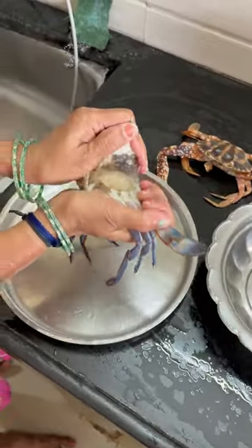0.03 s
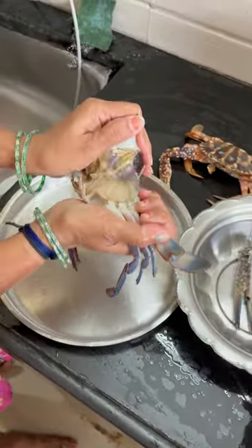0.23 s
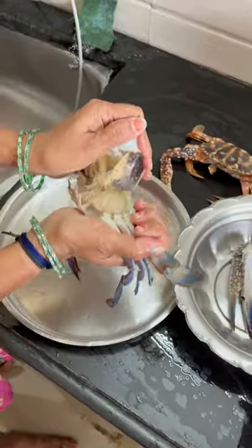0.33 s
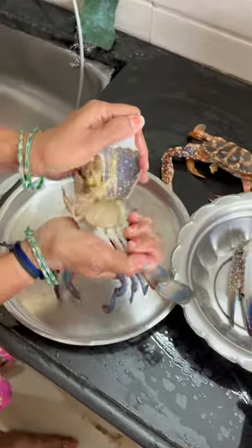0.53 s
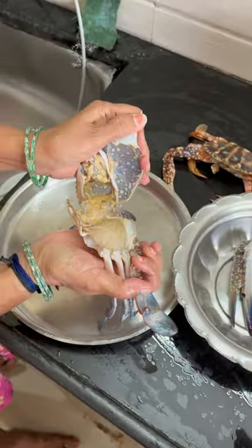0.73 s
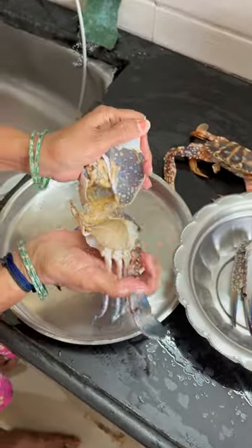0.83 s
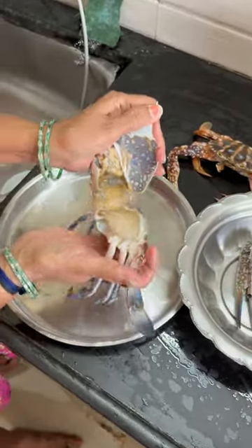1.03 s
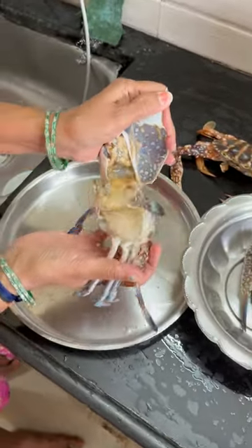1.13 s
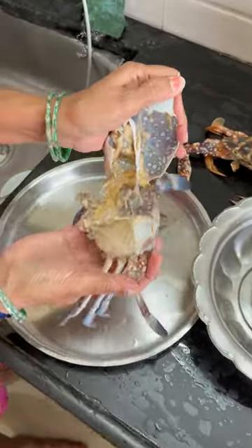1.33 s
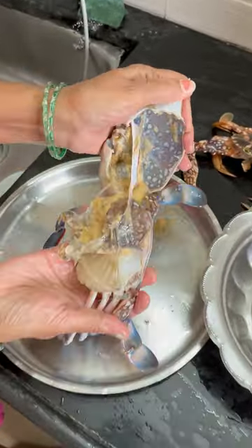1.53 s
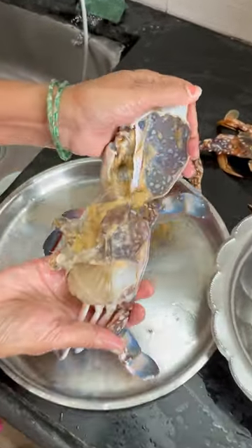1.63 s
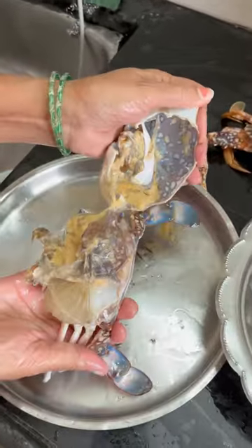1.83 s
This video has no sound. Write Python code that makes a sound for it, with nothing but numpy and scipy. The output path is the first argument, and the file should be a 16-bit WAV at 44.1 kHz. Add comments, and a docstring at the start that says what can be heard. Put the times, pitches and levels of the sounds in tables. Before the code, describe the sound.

A crab shell is cracked open by hand over a steel plate: one loud clattering knock, a run of sharp snaps, then quiet wet crunching and rustling, close up in a reflective tiled kitchen.

```python
"""A steel plate is knocked and rings while hands pry a crab shell open in a tiled kitchen, close to a phone.
Knocks and cracks are coloured noise bursts with struck modes; wet crunches are clusters of damped pops.
Grain noise makes the rustle of flesh and fingers; damped sines make dull bumps and a clink of glass bangles.
Diffuse echoes follow the nearby sounds; room tone and the steady lines of a motor lie underneath."""
import sys
import numpy as np
from scipy import signal
from scipy.fft import rfft, irfft
from scipy.io import wavfile
from scipy.ndimage import uniform_filter1d

SR = 44100
rng = np.random.default_rng(int(sys.argv[2]) if len(sys.argv) > 2 else 0)


def dump_mix(stems):
    """Bounce the given channels to the path in sys.argv[1] as a 16-bit WAV at rate SR."""
    frames = np.atleast_2d(stems).T  # one column per channel
    limited = np.clip(frames, -1, 1)  # hard clip at full scale
    pcm = np.round(limited * 32767).astype(np.int16)
    wavfile.write(sys.argv[1], SR, pcm)


N = 83790
T = np.arange(N) / SR
HZ = np.fft.rfftfreq(N, 1 / SR) + 1e-3  # offset keeps log and division finite

SHARED_TREBLE_HZ = 4900  # above this both channels carry the same treble
CRACK_RISE_S = 0.0014
# Phase lead of the right port for direct sound. Each row: frequency in Hz, lead in radians.
PORT_LEAD = [(200, 0.14), (700, 1.68), (2600, 0.85), (3400, 2.72), (4600, 1.385)]


def undb(db):
    """dB to amplitude gain."""
    return 10 ** (np.asarray(db) / 20)


def unit(x):
    """Scale to rms 1."""
    return x / np.sqrt(np.mean(x ** 2))


def read(table, hz=HZ):
    """Interpolate a (Hz, value) table on a log-frequency axis."""
    table_hz, values = np.array(table).T
    return np.interp(np.log(hz), np.log(table_hz), values)


def colour(x, table):
    """Filter by a (Hz, relative dB) spectrum that falls away outside its ends; white rms 1 stays rms 1."""
    low_edge = np.clip(HZ / table[0][0], 0, 1) ** 2
    high_edge = np.clip(table[-1][0] / HZ, 0, 1) ** 4
    return irfft(rfft(x) * unit(undb(read(table)) * low_edge * high_edge), N)


def burst(s, rise_s, fall_s, hz=0, lead=np.pi / 2):
    """Exponential rise from time s and decay (time constants): a sine, or at the defaults an envelope."""
    out = np.zeros(N)
    rise_s, fall_s = max(rise_s, 1e-4), max(fall_s, 2e-4)
    first = int(np.ceil(s * SR))
    t = T[first:first + int(10 * fall_s * SR)] - s
    envelope = (1 - np.exp(-t / rise_s)) * np.exp(-t / fall_s)
    out[first:first + len(t)] = envelope * np.sin(2 * np.pi * hz * t + lead)
    return out


def tone(s, hz, t60, rise_s, lead=0):
    """A mode struck at time s, its decay falling 60 dB in t60 seconds."""
    return burst(s, rise_s, t60 / np.log(1000), hz, lead)


def splinters(table, mid_table):
    """Rough contact: noise bursts (s, mid dB, treble dB, decay constant s) in two colours, high-passed."""
    # Treble spectrum. Each row: frequency in Hz, relative density in dB.
    treble_table = [(5000, -0.5), (6500, -6), (8000, -6.5), (10500, -12.5), (13000, -14), (15500, -23.5)]
    low_cut_hz = 131
    mid = colour(rng.standard_normal(N), mid_table)
    high = colour(rng.standard_normal(N), treble_table)
    out = np.zeros(N)
    for s, db, treble_db, fall_s in table:
        envelope = burst(s, min(CRACK_RISE_S, fall_s), fall_s)
        out += envelope * (undb(db) * mid + undb(treble_db) * high)
    return signal.sosfilt(signal.butter(2, low_cut_hz, "high", fs=SR, output="sos"), out)


def plate():
    """Each knock is a short rough contact that excites the plate modes, phased differently at each port."""
    # Each row: start in seconds, mid level in dB, treble level in dB, ring level in dB,
    # contact decay constant in seconds.
    knocks = [(0.212, -53.5, -20.5, -60, 0.0019), (0.2199, -25, -71.5, -58, 0.012),
              (0.2243, -8, -6.5, -47, 0.0019), (0.2272, -4.5, -15.5, -26, 0.0038),
              (0.261, -17.5, -25.5, -41, 0.0092)]
    # Each row: mode frequency in Hz, level in dB, 60 dB decay in seconds.
    plate_modes = [(301, -5, .25), (423, -3, .3), (610, -7, .3), (866, -5, .4), (1197, 0, .3),
                   (1435, -13, .8), (1643, 2, .25), (1702, -2, .42), (1981, -12, .9), (2403, -1, .55),
                   (2688, -2, .38), (3062, -5, .38), (3461, -10, .55), (3818, -5, .32), (3950, -3, .25),
                   (4155, -2, .26), (4604, -4, .35)]
    # Contact spectrum. Each row: frequency in Hz, relative density in dB.
    knock_colour = [(200, -5), (400, 2), (700, -12), (1200, -0.5), (2000, -8), (3500, 4), (4700, -3.5)]
    contacts = [(s, db, treble_db, contact_s) for s, db, treble_db, _, contact_s in knocks]
    rough = splinters(contacts, knock_colour)
    ringing = np.zeros((2, N))
    for s, _, _, ring_db, contact_s in knocks:
        rise_s = contact_s / 2
        for hz, mode_db, t60 in plate_modes:
            gain = undb(ring_db + mode_db)
            ringing[0] += gain * tone(s, hz, t60, rise_s)
            ringing[1] += gain * tone(s, hz, t60, rise_s, read(PORT_LEAD, hz))
    return rough, ringing


def shell():
    """A crack is a few ms of splintering plus a brief ring of the shell modes at its own pitch."""
    # Each row: start in seconds, ring level in dB, pitch in Hz, splinter mid level in dB,
    # splinter treble level in dB, ring decay constant in seconds (splinters decay in half of it).
    # Splinter levels are before splinter_gain_db.
    cracks = [(0.5039, -22.5, 1510, -38, -34.5, 0.0022), (.5812, -7, 2080, -19, -18.5, 0.0016),
              (0.62, -18, 1970, -22, -55, 0.0012), (0.635, -12, 1990, -37, -58, 0.00079),
              (0.7104, -20.5, 1080, -36, -50, 0.00074), (.747, -32.5, 2310, -39, -61, 0.0023),
              (1.4795, -51, 4370, -45.5, -61, 0.00099)]
    # Splinter spectrum. Each row: frequency in Hz, relative density in dB.
    crack_colour = [(150, -7), (350, 5), (700, -4), (1300, -2), (2000, -5.5), (3200, 8.5), (4700, 3)]
    # Each row: mode frequency as a multiple of the pitch, level in dB.
    shell_modes = [(1, 0), (.62, -15.5), (1.53, -7), (2.15, -20), (3.7, -13)]
    splinter_gain_db = 18.5
    snaps = [(s, db, treble_db, ring_s / 2) for s, _, _, db, treble_db, ring_s in cracks]
    rough = undb(splinter_gain_db) * splinters(snaps, crack_colour)
    ring = np.zeros(N)
    for s, db, pitch_hz, _, _, ring_s in cracks:
        for ratio, mode_db in shell_modes:
            t60 = ring_s * np.log(1000) / max(ratio, 1)  # higher modes die sooner
            phase = rng.uniform(0, 2 * np.pi)
            ring += undb(db + mode_db) * tone(s, pitch_hz * ratio, t60, CRACK_RISE_S, phase)
    return rough, ring


def crunches():
    """Each wet crunch is a cluster of six tiny damped pops near its pitch, the first the strongest."""
    # Each row: start in seconds, level in dB, pitch in Hz, cluster length in seconds.
    crunch_rows = [(0.188, -45, 1160, 0.0039), (.5042, -26, 2760, 0.00042), (0.582, -39.5, 4350, .003),
                   (0.594, -27, 3120, 0.0096), (0.643, -28, 2960, .003), (0.921, -40.5, 2410, 0.0035),
                   (1.2266, -39, 2206, 0.0067), (1.249, -39.5, 1810, .004), (1.415, -38, 2700, 0.01),
                   (1.421, -56, 2700, .014), (1.415, -49, 1120, .02), (1.4387, -39, 2220, 0.0031),
                   (1.455, -41, 4800, .005), (1.563, -41, 2070, .006), (1.6036, -31, 2270, 0.00534),
                   (1.605, -38, 4330, .01), (1.66, -32, 4700, .03), (1.673, -46, 1060, .025),
                   (1.73, -41, 1990, .004), (1.784, -35.5, 1770, .01), (1.801, -29.5, 1660, .005),
                   (1.8048, -27, 3860, .002), (1.8074, -32, 1950, .002), (1.8085, -25, 4030, .007)]
    decay_cycles, pitch_spread, fade_db = 2.66, 0.2, -11  # spread: +- fraction; fade by cluster end
    out = np.zeros(N)
    for s, db, hz, length_s in crunch_rows:
        chance = rng.random((6, 3))
        chance[0, :2] = 0, 1 / 2  # first pop: on time, on pitch
        for late, off, turn in chance:
            pop_hz = hz * (1 + pitch_spread * (2 * off - 1))
            pop = burst(s + late * length_s, 1 / hz, decay_cycles / hz, pop_hz, 2 * np.pi * turn)
            out += undb(db + fade_db * np.sqrt(late)) * pop
    return out


def rustle():
    """Dense small wet grains of flesh and fingers; each half-octave band swells in its own patches."""
    # Three groups of level points. Each row: time in seconds, mid level in dB, treble level in dB.
    rustle_levels = [
        [(0.0, -44.5, -59), (0.048, -66.5, -65), (0.062, -51, -51), (0.092, -72, -65), (0.128, -47.5, -45.5),
         (0.178, -95, -65), (0.2, -56, -58)],
        [(0.8, -56.5, -62.5), (0.856, -58, -61), (0.908, -81, -85), (1.022, -64.5, -58.5), (1.06, -85.5, -87),
         (1.234, -55.5, -53), (1.35, -74.5, -78.5)],
        [(1.37, -83, -67), (1.438, -55, -89), (1.516, -71, -75.5), (1.662, -53.5, -54.5), (1.754, -58.5, -65.5),
         (1.812, -47.5, -44), (1.9, -55.5, -62.5)],
    ]
    # Mid spectrum. Each row: frequency in Hz, relative weight in dB.
    mid_colour = [(900, -10), (1500, -7.5), (2200, -3.5), (3500, 0), (4700, 0.5)]
    # Treble spectrum. Each row: frequency in Hz, relative weight in dB.
    treble_colour = [(5000, 1.5), (6500, -4), (8500, -8), (11000, -12.5), (15500, -18)]
    grains_per_s, grain_spread_db = 1500, 3  # rate per band
    patch_db, patch_s = 4, 0.058  # rms swell, smoothing window
    time_s, mid_db, treble_db = np.vstack([np.array(group) for group in rustle_levels]).T
    window = int(patch_s * SR)
    mid, high = np.zeros(N), np.zeros(N)
    for hz in 900 * 2 ** (np.arange(9) / 2):
        size_db = grain_spread_db * np.clip(rng.exponential(size=N), 0, 3)
        present = rng.random(N) < grains_per_s / SR
        grains = present * rng.standard_normal(N) * undb(size_db)
        band = np.cos(np.pi / 2 * np.clip(2 * np.log2(HZ / hz), -1, 1))
        smooth = uniform_filter1d(uniform_filter1d(rng.standard_normal(N), window), window)
        part = undb(patch_db * unit(smooth)) * irfft(rfft(grains) * band, N)
        if hz < SHARED_TREBLE_HZ:
            mid += part
        else:
            high += part
    mid = undb(np.interp(T, time_s, mid_db)) * unit(colour(mid, mid_colour))
    high = undb(np.interp(T, time_s, treble_db)) * unit(colour(high, treble_colour))
    return mid + high


def bumps():
    """Dull bumps of the body: soft low damped sines."""
    # Each row: start in seconds, level in dB, pitch in Hz, 60 dB decay in seconds.
    bump_rows = [(0.229, -40, 107, 0.4), (0.585, -27, 323, 0.04), (0.701, -41.5, 307.4, 0.19)]
    return sum(undb(db) * tone(s, hz, t60, 0.0013) for s, db, hz, t60 in bump_rows)


def bangles():
    """Tiny glass ring: each clink strikes all bangle modes."""
    # Each row: start in seconds, level in dB.
    clinks = [(1.567, -46.5)]
    # Each row: mode frequency in Hz, level in dB, 60 dB decay in seconds.
    bangle_modes = [(10440, 3.3, 0.095), (11160, 4.4, 0.068)]
    return sum(undb(db + mode_db) * tone(s, hz, t60, 0.00074)
               for s, db in clinks for hz, mode_db, t60 in bangle_modes)


def pair():
    """Diffuse noise at two ports, mixed from mid and side parts to a set likeness per frequency."""
    # Each row: frequency in Hz, likeness of the ports from 0 to 1.
    likeness = [(300, 0.87), (800, 0.085), (1600, 0.28), (2500, 0.32), (4500, 0.14)]
    alike = read(likeness)
    mid, side = rfft(rng.standard_normal((2, N)))
    mid, side = mid * np.sqrt((1 + alike) / 2), side * np.sqrt((1 - alike) / 2)
    return irfft(np.array([mid + side, mid - side]), N)


def room(x):
    """Diffuse echoes of the tiles, each octave with its own decay; the first ones come in lumps."""
    # Each row: frequency in Hz, 60 dB decay in seconds.
    room_decay = [(125, 0.7), (500, 0.52), (2000, 0.55), (4000, 0.4), (8000, 0.27), (14000, 0.24)]
    rise_s, lump_db, lump_fade_s = 0.0008, 3, 0.05
    noise = rfft(pair())
    echo = np.zeros((2, N))
    for hz in 62.5 * 2. ** np.arange(9):
        band = np.cos(np.pi / 2 * np.clip(np.log2(HZ / hz), -1, 1)) ** 2
        t60 = read(room_decay, hz)
        decay = burst(0, rise_s, t60 / np.log(1000))
        echo += irfft(noise * band, N) * decay / np.sqrt(t60 * SR / np.log(1e6))  # near-equal energy
    lumps = unit(uniform_filter1d(rng.standard_normal(N), size=100)) * np.exp(-T / lump_fade_s)
    return signal.fftconvolve(x[None], echo * undb(lump_db * lumps), axes=1)[:, :N]


def kitchen():
    """Room tone plus motor lines, each a steady sine with a wavering narrow-band part."""
    # Each row: frequency in Hz, relative density in dB.
    tone_colour = [(30, -9), (60, -4), (100, -1), (200, -10), (500, -8.5), (780, -17), (950, -35),
                   (1500, -28.5), (3000, -37), (8000, -34), (14500, -45), (15500, -71)]
    # Each row: line frequency in Hz, rms level in dB.
    hum_lines = [(96.9, -68.5), (134.6, -69), (171, -60.5), (398.4, -72.5), (484.5, -68.5), (629.8, -73)]
    tone_db, width_hz, steady = -58.5, 5, 0.9  # steady: share of line power
    noise = rfft(rng.standard_normal(N))
    hum = np.zeros(N)
    for hz, db in hum_lines:
        sine = np.sqrt(2 * steady) * np.sin(2 * np.pi * hz * T)
        waver = unit(irfft(noise / (1 + 2j * (HZ - hz) / width_hz), N))
        hum += undb(db) * (sine + np.sqrt(1 - steady) * waver)
    return undb(tone_db) * colour(pair(), tone_colour) + hum


def scene():
    """Direct sounds, their echoes and the room tone at two ports."""
    # Left-over-right level of nearby sounds. Each row: frequency in Hz, difference in dB.
    left_excess = [(300, 1), (1000, 1.5), (2200, -1), (4500, -2)]
    knock, ringing = plate()
    crack, pock = shell()
    pock = pock + crunches() + bumps() + bangles()
    soft = rustle()
    # echo sends in dB: knock -1.5, plate ring -8, crack -5.5, shell and small sounds -7.5, rustle -1.5
    wet = room(undb(-1.5) * knock + undb(-8) * ringing[0] + undb(-5.5) * crack
               + undb(-7.5) * pock + undb(-1.5) * soft)
    direct = knock + crack + pock + soft
    direct = np.array([direct, irfft(rfft(direct) * np.exp(1j * read(PORT_LEAD)), N)])
    left_gain = undb(read(left_excess) / 2)
    nearby = rfft(direct + ringing + wet) * np.array([left_gain, 1 / left_gain])
    return irfft(nearby, N) + kitchen()


def soften(x):
    """Saturation that mainly rounds peaks near the 0.95 ceiling."""
    return x / (1 + (x / 0.95) ** 4) ** (1 / 4)


def record(dry):
    """Above about 4.9 kHz both channels carry the same treble, the right slightly later;
    peaks are rounded and the top is cut."""
    low_cut_hz, top_hz = 34.3, 15900
    lag_s, in_phase_hz = 0.00023, 8050  # right lags left; channels agree in phase at in_phase_hz
    left, right = rfft(dry) / (1 + (low_cut_hz / HZ) ** 4)
    share = 1 / (1 + (SHARED_TREBLE_HZ / HZ) ** 40)
    lagged = left * np.exp(-2j * np.pi * lag_s * (HZ - in_phase_hz))
    right = (1 - share) * right + share * lagged
    rounded = soften(irfft(np.array([left, right]), N))
    return signal.sosfilt(signal.ellip(8, .2, 80, top_hz, fs=SR, output="sos"), rounded)


dry = scene()
out = record(dry)
dump_mix(out)
```